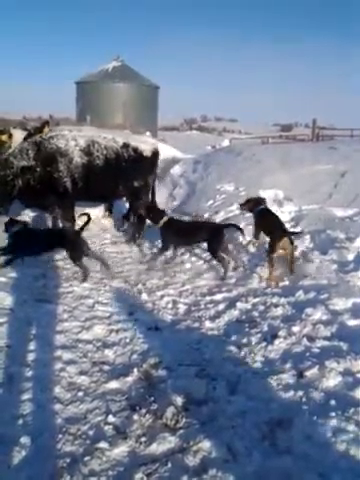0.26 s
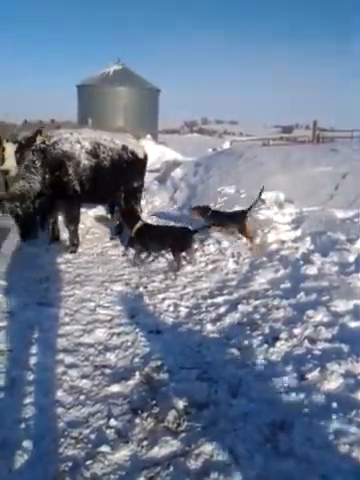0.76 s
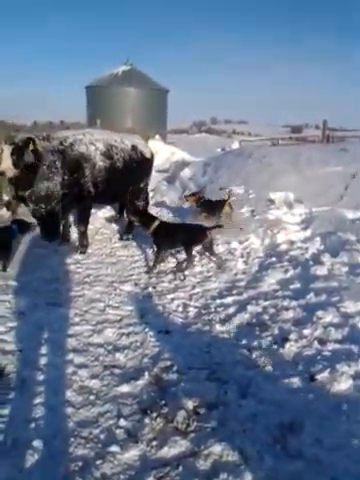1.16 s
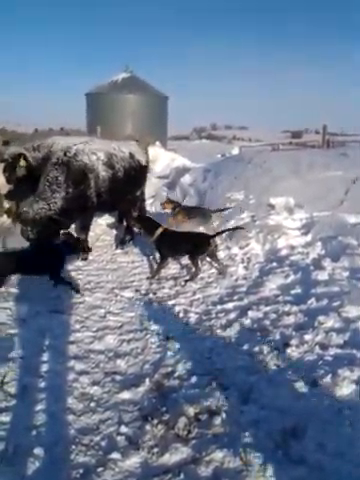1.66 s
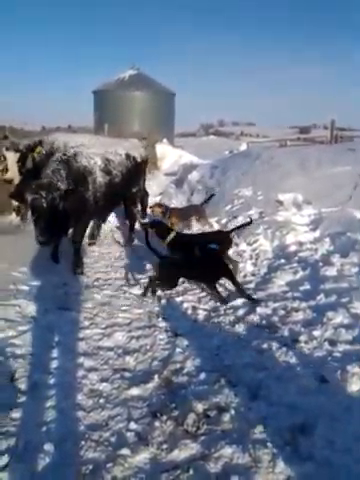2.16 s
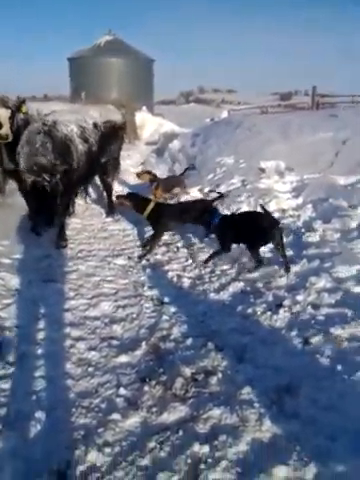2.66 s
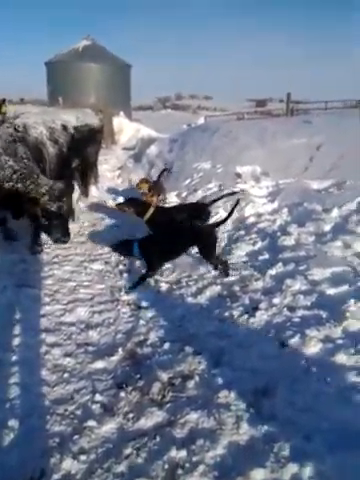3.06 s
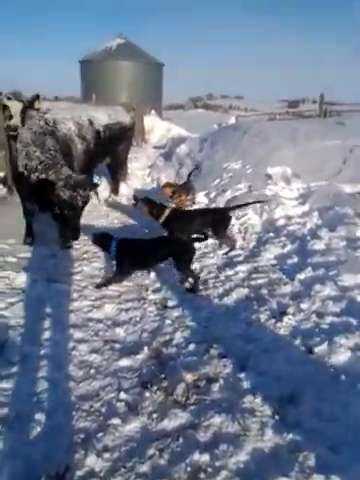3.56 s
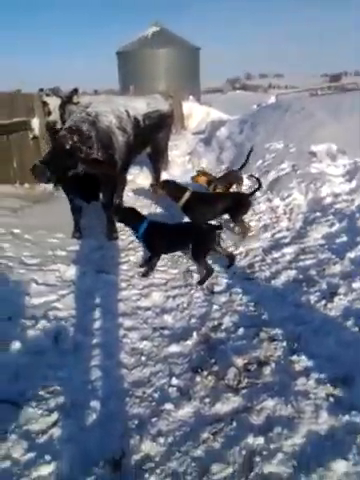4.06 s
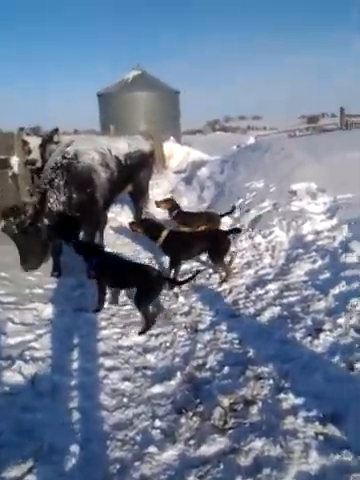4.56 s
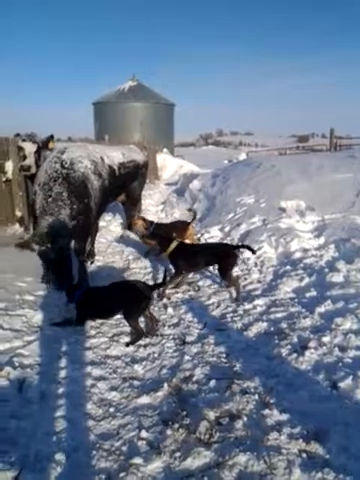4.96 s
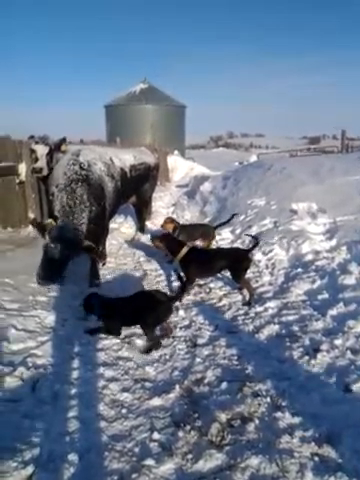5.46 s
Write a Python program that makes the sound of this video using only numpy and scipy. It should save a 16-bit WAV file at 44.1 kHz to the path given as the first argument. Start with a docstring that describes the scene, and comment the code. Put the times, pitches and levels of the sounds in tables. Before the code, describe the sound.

A frantic pack of dogs barks, bays and yelps around cattle outdoors, with faint snow crunch and low rumble beneath the clipped barking.

```python
"""Four dogs in a snowy farmyard

A deep bawler swoops up to held notes, a hound bays hoarsely, a chopper spits falling barks, a small dog yelps.
Each voice blends steady fold harmonics with chaotic growl and pulsed air, shaped by its throat.
Paws are grainy noise, footfalls low thuds; the yard adds a faint tail, a grain bin a very faint echo a side.
The right microphone is driven into clipping; the left one is weak, muffled and slightly late, over rumble."""
import sys
import numpy as np
from scipy import signal
from scipy.fft import rfft, irfft, next_fast_len
from scipy.io import wavfile
from scipy.ndimage import uniform_filter1d, map_coordinates

SR = 44100
rng = np.random.default_rng(int(sys.argv[2]) if len(sys.argv) > 2 else 0)


def wav_record(signal):
    """Record a signal, one row per channel, as 16-bit PCM in the file named by sys.argv[1]."""
    frames = np.transpose(np.atleast_2d(signal))
    bounded = np.clip(frames, -1, 1)
    # unit amplitude maps onto the largest positive 16-bit level
    quanta = np.round(bounded * 32767).astype(np.int16)
    wavfile.write(sys.argv[1], SR, quanta)


N = 252252  # samples


def amp(db):
    """Decibels to gain."""
    return 10 ** (np.asarray(db) / 20)


def unit(x):
    """x scaled to rms 1."""
    return x / np.sqrt(np.mean(x ** 2) + 1e-20)


def along(points, hz):
    """(f/Hz, value) points read on a log frequency axis."""
    f, v = np.transpose(points)
    return np.interp(np.log(hz + 1), np.log(f), v)


def wobble(rate, size):
    """A smooth random curve through `rate` random knots a second."""
    knots = rng.standard_normal(int(size * rate / SR) + 4)
    return map_coordinates(knots, [np.arange(size) * rate / SR])


def coloured(x, spectrum):
    """x filtered by an (f/Hz, level/dB) response."""
    n = x.shape[-1]
    m = next_fast_len(n + 8192)
    gain = amp(along(spectrum, np.fft.rfftfreq(m, 1 / SR)))
    return irfft(rfft(x, m) * gain, m)[..., :n]


def folds(pitch, throat, count):
    """Vocal fold harmonics, each as strong as the throat passes it; also the phase of the cycle."""
    phase = 2 * np.pi * np.cumsum(pitch) / SR
    k = np.arange(1, count + 1)[:, None]
    smooth_pitch = uniform_filter1d(pitch, SR // 200)
    gain = amp(along(throat, k * smooth_pitch))
    start_phase = rng.uniform(0, 2 * np.pi, k.shape)
    wave = np.sum(gain * np.sin(k * phase + start_phase), 0)
    return wave / np.sqrt(np.sum(gain ** 2, 0) / 2), phase


def bark(rows, clear, rasp, jitter, air, tremor):
    """One bark: steady fold vibration that breaks into irregular cycles and puffs of air as it roughens."""
    s, hz, db, rough, bite_db = np.transpose(rows)
    first = int(s[0] * SR)
    t = np.arange(first, max(int(s[-1] * SR), first + SR // 50)) / SR
    n = len(t)
    pitch = np.interp(t, s, hz)
    rough = np.clip(np.interp(t, s, rough), 0, 1)
    # the roughness flickers, most widely in a clear voice
    flicker = np.exp(0.9 * (1 - rough) * wobble(60.2, n))
    rough = np.clip(rough * flicker, 0, 1)

    trembling_pitch = pitch * np.exp((0.0058 + tremor * rough) * wobble(258.1, n))
    tone, _ = folds(trembling_pitch, clear, count=14)
    tone = unit(tone * amp(3.1 * rough * wobble(138.0, n)))

    # chaotic folds: cycle length and strength wander fast
    chaotic_pitch = pitch * np.exp(jitter * wobble(349.4, n))
    growl, phase = folds(chaotic_pitch, rasp, count=22)
    growl = unit(growl * amp(2.3 * wobble(297.2, n)))

    # air hisses through the glottis, swelling once a cycle
    hiss = rng.standard_normal(n) * (1 + 0.36 * np.cos(phase))
    puffs = unit(coloured(hiss, rasp))
    hoarse = np.sqrt(1 - air) * growl + np.sqrt(air) * puffs
    voice = np.sqrt(1 - rough) * tone + np.sqrt(rough) * hoarse

    # a wider mouth lets out more of the upper resonances
    upper = coloured(voice, [(600, -40), (950, -10), (1350, 0)])
    voice = voice + (amp(np.interp(t, s, bite_db)) - 1) * upper
    fade = np.clip(np.minimum(t - t[0], t[-1] - t) / 0.0005, 0, 1)
    shaped = voice * amp(np.interp(t, s, db)) * fade
    return np.pad(shaped, (first, N))[:N]


def dog(barks, clear, rasp, jitter, air, tremor):
    """All barks of one throat, each a list of stages (t/s, pitch f/Hz, level/dB, roughness 0-1, brightness/dB)."""
    return sum(bark(rows, clear, rasp, jitter, air, tremor) for rows in barks)


ATTACK_DB = 22  # a bawl, bay or chop climbs this far in its attack
BAWL_START_HZ, BAWL_OPEN_HZ, BAWL_BREAK_HZ = 127.92, 192.8, 261.4  # pitch along the swoop
BAWL_END_HZ, BAWL_RELEASE_DB = 132.7, 30  # pitch as it dies, and the drop in level
BAWL_LOCK_S = .02  # the rasp locks into a note this fast
MUTTER_S, MUTTER_HZ, MUTTER_DB = .045, 111.99, -46  # the low growl that leads into each bawl
BAWL_SAG_HZ_PER_S, BAWL_FADE_DB_PER_S = 79.5, 123.5  # while the note is held
BAWL_RASP, BAWL_TIRING = 0.81, 1.33  # swoop roughness 0-1; how many times rougher the held note grows
BAWL_SHUT_DB, BAWL_OPENING_DB, BAWL_HELD_DB = -15, -5, -1  # mouth brightness


def bawl(s, attack, swoop, held, release, hz, swoop_db, held_db, rough, bite_db):
    """A growl swoops up as the mouth opens, locks into a clearer note that sags, and drops away."""
    start, lock = s - attack, s + swoop
    tired = lock + held
    tired_db = held_db - BAWL_FADE_DB_PER_S * held
    tired_hz = hz - BAWL_SAG_HZ_PER_S * held
    return [(start - MUTTER_S, MUTTER_HZ, MUTTER_DB, BAWL_RASP, BAWL_SHUT_DB),
            (start, BAWL_START_HZ, swoop_db - ATTACK_DB, BAWL_RASP, BAWL_SHUT_DB),
            (s, BAWL_OPEN_HZ, swoop_db, BAWL_RASP, BAWL_OPENING_DB),
            (lock - BAWL_LOCK_S, BAWL_BREAK_HZ, swoop_db, BAWL_RASP, bite_db),
            (lock, hz, held_db, rough, BAWL_HELD_DB),
            (tired, tired_hz, tired_db, rough * BAWL_TIRING, BAWL_HELD_DB),
            (tired + release, BAWL_END_HZ, tired_db - BAWL_RELEASE_DB, BAWL_RASP, BAWL_SHUT_DB)]


# the bawler's throat, ringing clear and wide open in the rasp: f/Hz, level/dB
BAWLER_CLEAR_THROAT = [(150, -40), (300, -43), (450, -20), (580, 1), (870, -28), (1150, -60), (1700, -27),
                       (2400, -27), (7000, -63)]
BAWLER_RASP_THROAT = [(100, -11.5), (250, -10), (400, 0), (560, 4), (800, -2), (1100, 5), (1400, -6.5),
                      (1720, 0), (2200, -24.5), (4000, -26), (9000, -32.5)]
# bawls: t/s, attack/s, swoop/s, held/s, release/s, held pitch f/Hz, swoop level/dB, held level/dB,
# roughness as the hold begins 0-1, mouth brightness as the swoop ends/dB
BAWL_CUES = [ (0.866, 0.036, 0.068, 0.078, 0.032, 289.2, 1, 5.5, 0.28, 7),
             (1.58, 0.032, 0.048, 0.085, 0.063, 293.4, 0.5, 6.5, 0.13, 3),
             (2.32, .022, .068, 0.071, 0.058, 290.3, 0.5, 8, 0.14, 9.5),
             (3.3, 0.074, 0.083, 0.068, 0.054, 295.9, -1.5, 3, 0.09, 3),
             (3.945, 0.032, .071, 0.06, 0.066, 296, 2, 4.5, 0.15, 1.5),
             (4.578, .022, .073, 0.066, 0.072, 293.5, 2.5, 4, 0.11, 0.5),
             (5.325, .028, .074, 0.048, 0.069, 299.2, 3.5, 3.5, 0.26, 3.5), ]


def bawler():
    """The deep dog: large folds swoop up in a rasp, then lock."""
    barks = [bawl(*row) for row in BAWL_CUES]
    return dog(barks, BAWLER_CLEAR_THROAT, BAWLER_RASP_THROAT, jitter=0.0261, air=0.5, tremor=0.032)


# shares of the note's pitch, and of the tail's pitch for the last one
BAY_START_RATIO, BAY_OPEN_RATIO, BAY_SETTLED_RATIO, BAY_END_RATIO = .81, .91, 0.99, 0.69
BAY_SETTLE_S, BAY_RELEASE_S = 0.0263, 0.067
BAY_SWELL_DB, BAY_FADE_DB, BAY_RELEASE_DB = 5, 4, 16.5  # rise to the note; total fall at hold end and at note end
OVERLAP_S, TAIL_ATTACK_S, TAIL_EDGE_DB = .015, 0.02, 10  # the note hands over to its tail
BAY_RASP, BAY_CRACK_RASP, BAY_SHUT_DB = 0.71, 0.72, -8  # roughness 0-1 at edges and crack; mouth brightness


def bay(s, attack, held, hz, db, rough, bite_db, tail_after, tail_hz, tail_db):
    """A hoarse start settles on a note; as the mouth closes it cracks into a tail that slides down."""
    settled, crack = s + BAY_SETTLE_S, s + tail_after
    note = [(s - attack, hz * BAY_START_RATIO, db - ATTACK_DB, BAY_RASP, BAY_SHUT_DB),
            (s, hz * BAY_OPEN_RATIO, db - BAY_SWELL_DB, BAY_RASP, bite_db),
            (settled, hz * BAY_SETTLED_RATIO, db, rough, bite_db),
            (settled + held, hz, db - BAY_FADE_DB, rough, bite_db),
            (crack + OVERLAP_S, hz, db - BAY_RELEASE_DB, BAY_RASP, bite_db)]
    tail_edge_db = tail_db - TAIL_EDGE_DB
    tail = [(crack - TAIL_ATTACK_S, tail_hz, tail_edge_db, BAY_RASP, 0),
            (crack, tail_hz, tail_db, BAY_CRACK_RASP, 0),
            (crack + BAY_RELEASE_S, tail_hz * BAY_END_RATIO, tail_edge_db, BAY_RASP, BAY_SHUT_DB)]
    return note, tail


# the hound's throat, clear, wide open in the rasp, and with the mouth half shut: f/Hz, level/dB
HOUND_CLEAR_THROAT = [(200, -38), (390, -22), (770, 0), (1150, -26), (1550, -21), (2300, -28), (3200, -48),
                      (7000, -60)]
HOUND_RASP_THROAT = [(120, -17), (280, -22.5), (420, -2.5), (600, 2.5), (800, 0.5), (1000, -6),
                     (1280, -4.5), (1900, -14), (2800, -35), (4500, -37), (9000, -38)]
HOUND_CLOSING_THROAT = [(200, -18), (400, 7.5), (540, 18), (850, 0), (1100, -16), (1700, -3), (3000, -47),
                        (7000, -45)]
# bays: t/s, attack/s, held/s, pitch f/Hz, level/dB, roughness 0-1, mouth brightness/dB,
# tail after/s, tail pitch f/Hz, tail level/dB
BAY_CUES = [ (1.358, 0.03, 0.072, 385.2, 1, 0.39, -1, .11, 369, -7.5),
            (1.842, 0.018, 0.038, 399.8, 3, 0.52, 0.5, 0.08, 444.3, -6.5),
            (2.929, .03, 0.041, 393, 3.5, 0.24, -1.5, .063, 440, -4),
            (4.335, .04, 0.037, 394.9, -1, 0.65, 2.5, 0.16, 414, -9),
            (4.895, .036, .032, 392.8, 5.5, 0.13, -3.5, .078, 437.7, -10),
            (5.57, 0.034, 0.03, 392.4, 3.5, 0.4, -1.5, 0.13, 432.4, -5.5), ]


def hound():
    """The hoarse dog: the open throat voices the notes, the half-shut one their tails."""
    notes, tails = zip(*[bay(*row) for row in BAY_CUES])
    open_notes = dog(notes, HOUND_CLEAR_THROAT, HOUND_RASP_THROAT, jitter=0.0385, air=0.58, tremor=0.0582)
    closing_tails = dog(tails, HOUND_CLOSING_THROAT, HOUND_RASP_THROAT, jitter=0.045, air=0.44, tremor=0.056)
    return open_notes + closing_tails


CHOP_START_RATIO = .83  # share of the first pitch as the attack begins
CHOP_DROOP_HZ, CHOP_END_HZ = 416.4, 244.4  # pitch after the droop and at the end
CHOP_RELEASE_S, CHOP_FADE_DB, CHOP_RELEASE_DB = 0.049, 1, 23  # release; level lost over hold and release
CHOP_CLOSING_DB, CHOP_SHUT_DB = 1, -6  # brightness lost over the hold; brightness in the tail


def chop(s, attack, held, droop, first_hz, last_hz, db, droop_db, rough, later_rough, bite_db):
    """A harsh burst changes roughness over its hold, then droops in pitch and level as the mouth closes."""
    drooped = s + held + droop
    return [(s - attack, first_hz * CHOP_START_RATIO, db - ATTACK_DB, rough, bite_db),
            (s, first_hz, db, rough, bite_db),
            (s + held, last_hz, db - CHOP_FADE_DB, later_rough, bite_db - CHOP_CLOSING_DB),
            (drooped, CHOP_DROOP_HZ, droop_db, later_rough, CHOP_SHUT_DB),
            (drooped + CHOP_RELEASE_S, CHOP_END_HZ, droop_db - CHOP_RELEASE_DB, rough, CHOP_SHUT_DB)]


# the chopper's throat, ringing clear and wide open in the rasp: f/Hz, level/dB
CHOPPER_CLEAR_THROAT = [(200, 0), (400, 12.5), (540, 9.5), (850, -21), (1100, -8.5), (1700, -28),
                        (3000, -44), (7000, -39.5)]
CHOPPER_RASP_THROAT = [(120, -14.5), (280, -23.5), (450, -3.5), (580, 0), (690, 5.5), (860, 2.5),
                       (1080, -10.5), (1330, -7), (1620, -16), (2000, -14), (2800, -35), (4500, -37),
                       (7000, -42), (10000, -43)]
# chops: t/s, attack/s, held/s, droop/s, first pitch f/Hz, last held pitch f/Hz, level/dB, drooped level/dB, # #
# roughness 0-1, later roughness 0-1, mouth brightness/dB; the row at 1.98 s is no chop but a faint, clearer #
# note near 600 Hz that lingers after a bawl
CHOP_CUES = [ (0.304, 0.0075, 0.018, 0.038, 592.3, 518.6, 0, -12, 0.58, 0.65, 0.5),
             (0.452, 0.023, 0.057, .065, 591.7, 546.4, -3, -16.5, 1, 0.6, 7.5),
             (1.045, 0.046, 0.089, 0.076, 432.5, 478, -4.5, -24, 0.9, 0.77, 4.5),
             (1.98, 0.041, 0.026, 0.034, 606, 595, -10.5, -37, 0.37, 0.36, -4),
             (2.495, 0.054, .085, .048, 620, 493.7, -1.5, -6.5, 0.82, 1.03, -1),
             (3.078, .025, 0.074, 0.036, 608, 531, -4, -13.5, 0.9, 0.43, 6.5),
             (3.6, 0.019, .058, .052, 612.7, 525.5, 0.5, -8, 0.79, 0.54, 6),
             (4.142, .028, .043, 0.086, 686.6, 571, 2, -17.5, 0.95, 0.63, -1),
             (5.045, 0.061, 0.079, 0.034, 498.4, 478.7, -5, -15, 0.93, 0.35, 6), ]


def chopper():
    """The harsh dog: short barks with much growl and air. Its table also holds one faint, clearer note near 600
    Hz that lingers after a bawl, played through the same throat."""
    barks = [chop(*row) for row in CHOP_CUES]
    return dog(barks, CHOPPER_CLEAR_THROAT, CHOPPER_RASP_THROAT, jitter=0.0281, air=0.63, tremor=0.041)


YELP_START_RATIO, YELP_EDGE_DB = .88, 15.5  # share of the first pitch; level climbed and lost at the edges
YELP_RASP = 0.75  # roughness 0-1 of the frayed ends


def yelp(s, attack, glide, release, first_hz, last_hz, db, last_db, rough):
    """A thin high note that glides up or down and frays as it goes."""
    glided = s + glide
    return [(s - attack, first_hz * YELP_START_RATIO, db - YELP_EDGE_DB, YELP_RASP, 0),
            (s, first_hz, db, rough, 0),
            (glided, last_hz, last_db, YELP_RASP, 0),
            (glided + release, last_hz, last_db - YELP_EDGE_DB, YELP_RASP, 0)]


# the yelper's throat, ringing clear and wide open in the rasp: f/Hz, level/dB
YELPER_CLEAR_THROAT = [(400, -20), (700, -3), (1150, 0), (1600, -5), (2000, -12), (2280, -5), (2550, -34),
                       (4000, -37), (5200, -25), (6500, -38), (12000, -52)]
YELPER_RASP_THROAT = [(250, -25), (600, 4.5), (1000, 1), (1300, -8), (1700, -0.5), (2100, -21.5),
                      (2600, -26.5), (4500, -30.5), (7000, -27), (10000, -48)]
# yelps: t/s, attack/s, glide/s, release/s, first pitch f/Hz, last pitch f/Hz, level/dB,
# level after the glide/dB, roughness 0-1
YELP_CUES = [ (1.466, 0.034, 0.052, 0.23, 1085, 1247, -14.5, -10.5, 0.1),
             (1.953, 0.04, .04, 0.049, 1265, 687, -10.5, -17, 0.33),
             (2.629, .035, 0.029, 0.036, 1290, 987, -12, -18, 0.44),
             (3.218, 0.016, 0.059, 0.11, 995, 1225, -8, -7.5, 0.65),
             (4.425, .035, 0.041, 0.048, 1258, 1142, -11, -21, 0.06),
             (5.007, 0.028, .05, 0.15, 1040, 1338, -9, -19, 0),
             (5.678, 0.037, 0.037, 0.03, 1045, 1138, -10.5, -14, 0.42), ]
# one squeal that leaps to a nearly pure high note: t/s, pitch f/Hz, level/dB, roughness 0-1
SQUEAL_STAGES = [(3.818, 732, -56, 0.16), (3.836, 746.5, -7, 0), (3.854, 829, -7.5, 0.31),
                 (3.859, 1067, -2, 0.25), (3.875, 1263, -7.5, 0.06), (3.907, 1292, -3.5, 0.03),
                 (3.933, 1291, -4, 0.07), (3.97, 1165, -25, 0)]


def yelper():
    """The small dog: light folds give thin high yelps and one squeal."""
    squeal = [(*stage, 0) for stage in SQUEAL_STAGES]  # mouth brightness 0 dB
    barks = [yelp(*row) for row in YELP_CUES] + [squeal]
    return dog(barks, YELPER_CLEAR_THROAT, YELPER_RASP_THROAT, jitter=0.0605, air=0.34, tremor=0.062)


SHUFFLE_DB, FLURRY_EDGE_DB_PER_S = -54.5, 255  # crunch between flurries; how fast a flurry comes and goes
# flurries of paws in the snow: t/s, length/s, relative level/dB
FLURRY_CUES = [(0.324, 1.4, -42.5), (1.898, .22, -42.5), (2.211, 0.71, -46.5), (2.936, 0.602, -46),
               (3.687, 0.056, -41), (3.836, 1.14, -45), (4.887, 0.26, -48), (5.318, 0.19, -44)]
# colour of the crunch: f/Hz, relative level per Hz/dB
CRUNCH_COLOUR = [(60, -16), (150, 8), (400, 7), (650, -3.5), (1100, 2.5), (2000, -0.5), (3500, -4.5),
                 (5500, -8.5), (9000, -7), (14000, 9.5), (15000, -43)]


def paws(level_db, grain_db):
    """Cold snow crunches in dense uneven grains, in flurries as the dogs dart about."""
    t = np.arange(N) / SR
    flurries = []
    for s, length, db in FLURRY_CUES:
        outside = np.abs(t - np.clip(t, s, s + length))  # seconds away from the flurry
        flurries.append(db - FLURRY_EDGE_DB_PER_S * outside)
    crunch_db = np.maximum(np.max(flurries, axis=0), SHUFFLE_DB)
    unevenness_db = grain_db * wobble(460, N) + 1.5 * wobble(24.995, N)
    grains = rng.standard_normal(N) * amp(unevenness_db)
    return unit(coloured(grains, CRUNCH_COLOUR)) * amp(level_db + crunch_db)


# dull footfalls in the snow, before the right channel's boost: t/s, left level/dB, right level/dB
THUD_CUES = [(2.75, -43, -35), (4.349, -33, -66), (4.44, -38, -52)]


def footfalls(decay):
    """Heavy steps: low noise swells and dies by 60 dB in `decay` seconds on each side of a peak."""
    t = np.arange(N) / SR
    push = 0
    for s, left_db, right_db in THUD_CUES:
        peak_db = np.array([[left_db], [right_db]])
        push = push + amp(peak_db - 60 * np.abs(t - s) / decay)
    thud_colour = [(30, -14), (110, 8.5), (250, -1), (700, -42), (3000, -90)]
    return push * unit(coloured(rng.standard_normal(N), thud_colour))


# reverberation of the yard: f/Hz, time to fall 60 dB/s
YARD_DECAY = [(200, 0.58), (600, 0.61), (2000, 0.46), (8000, 0.71)]


def yard(x, tail_db, bin_db, bin_delay):
    """Snow banks and fences scatter a faint tail; the steel grain bin adds a very faint delayed copy."""
    hz, t, z = signal.stft(rng.standard_normal(SR), SR, nperseg=256)
    decay = amp(-60 * t / along(YARD_DECAY, hz)[:, None])
    tail = signal.istft(z * decay, SR, nperseg=256)[1]
    scatter = signal.fftconvolve(x, tail / np.linalg.norm(tail))[:N]
    echo = np.pad(x, (int(bin_delay * SR), 0))[:N]
    return amp(tail_db) * scatter + amp(bin_db) * echo


def scene():
    """The pack, yard and paws at two microphones; the bawler stands furthest to the left."""
    bawls, bays, chops, yelps = bawler(), hound(), chopper(), yelper()
    pack = bawls + bays + chops + yelps
    left = amp(0.5) * bawls + amp(-3.0) * bays + amp(-1.9) * chops + amp(-2) * yelps
    # the echo comes later on the left than on the right
    left = left + yard(pack, tail_db=-21, bin_db=-57, bin_delay=.46)
    left = left + paws(level_db=14, grain_db=16)
    right = pack + yard(pack, tail_db=-19.5, bin_db=-55.5, bin_delay=0.18)
    right = right + paws(level_db=13.5, grain_db=2.0)
    return np.array([left, right])


START_S, TOP_HZ = .305, 15500  # silence before this time; nothing above this frequency
# colour of the low rumble: f/Hz, relative level per Hz/dB
RUMBLE_COLOUR = [(20, -10), (60, -1), (110, -4), (200, 9), (400, -12), (1000, -20), (4000, -25),
                 (9000, -29), (14200, -25.5), (15000, -53)]
# microphone responses, left muffled and right open: f/Hz, level/dB
LEFT_RESPONSE = [(30, -56), (170, -44), (340, -19.5), (600, -20), (1000, -22), (1700, -25.5), (2500, -30),
                 (7000, -67), (14000, -38)]
RIGHT_RESPONSE = [(30, -23), (200, -3.5), (4500, -1), (5700, 3), (6900, 8), (8500, -0.5), (12000, -18.5)]


def record(dry):
    """A muffled, slightly late left microphone over low rumble, and a hot right one that clips flat."""
    rumble = amp(-48.5) * unit(coloured(rng.standard_normal((2, N)), RUMBLE_COLOUR))
    floor = rumble + footfalls(decay=0.27)
    late = np.pad(dry[0], (int(0.00024 * SR), 0))[:N]
    ports = np.array([coloured(late, LEFT_RESPONSE), coloured(dry[1], RIGHT_RESPONSE)]) + floor
    ports = ports * (np.arange(N) / SR > START_S)
    hot = ports * np.array([[1], [amp(2.5)]])  # the right channel runs hotter
    clipped = hot / (1 + np.abs(hot) ** 16) ** (1 / 16)
    # the right channel's top is softened after the clipping
    soft_right = coloured(clipped[1], [(8000, 0), (10000, 0), (13500, -7), (16000, -19)])
    softened = np.array([clipped[0], soft_right])
    below_top = np.fft.rfftfreq(N, 1 / SR) < TOP_HZ
    return irfft(rfft(softened) * below_top, N)


dry = scene()
out = record(dry)
wav_record(out)
```